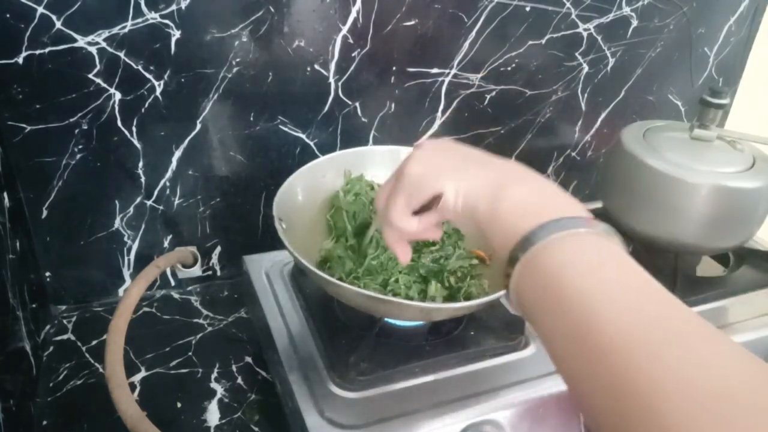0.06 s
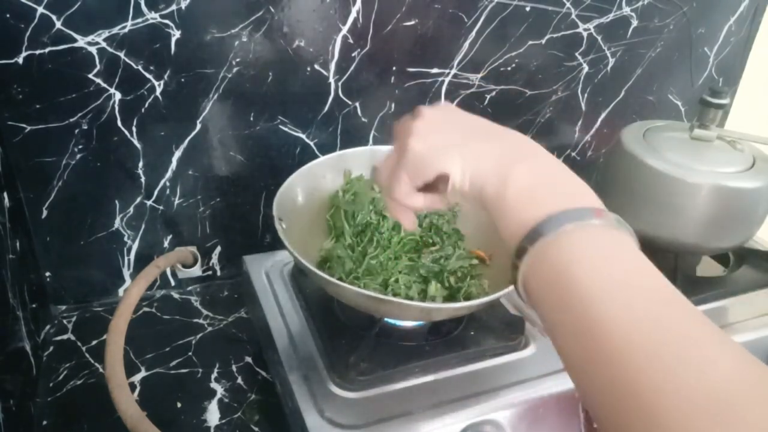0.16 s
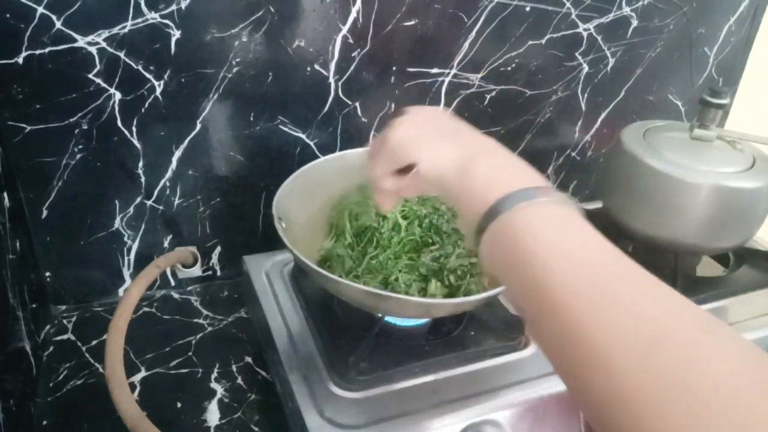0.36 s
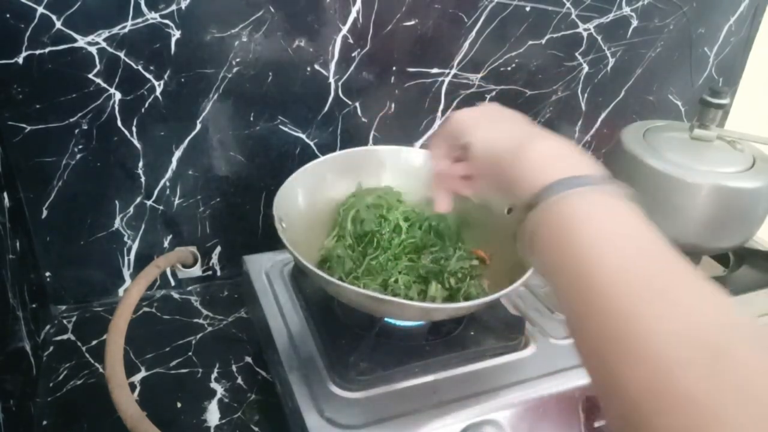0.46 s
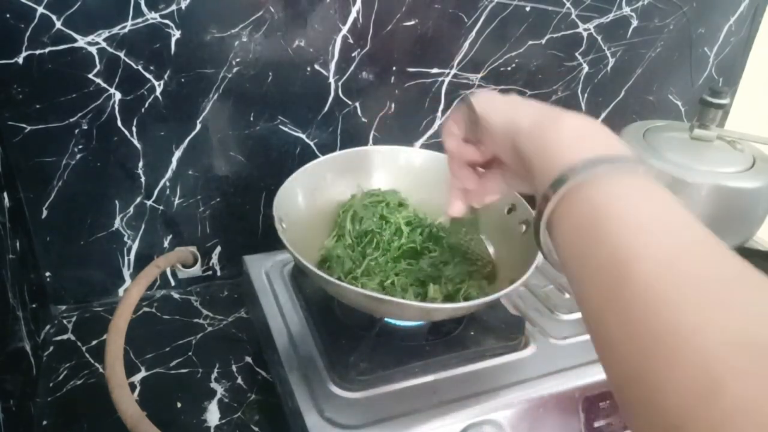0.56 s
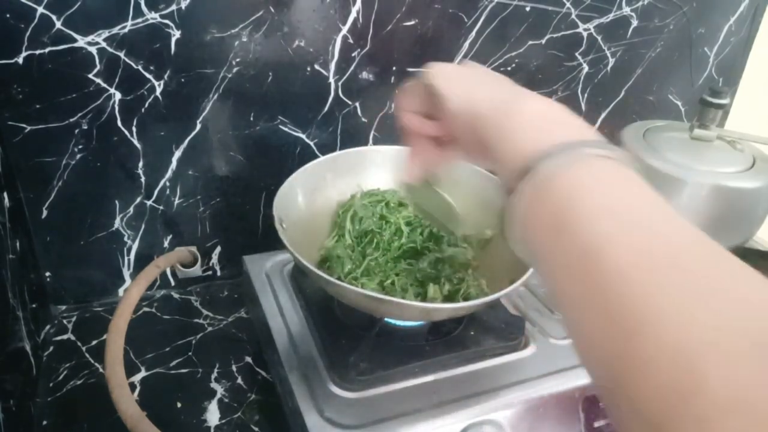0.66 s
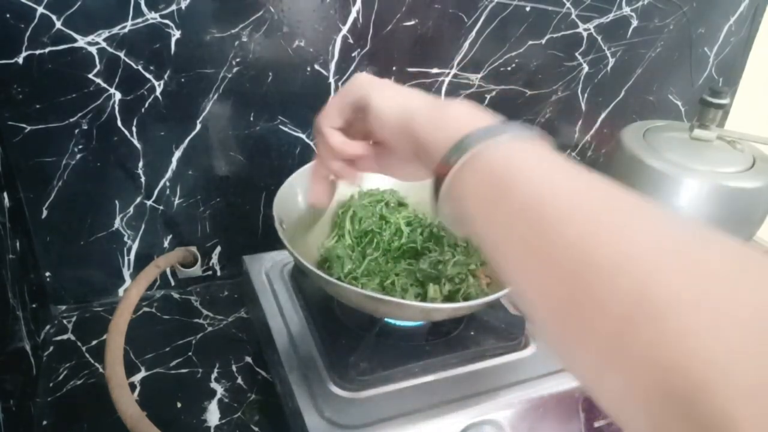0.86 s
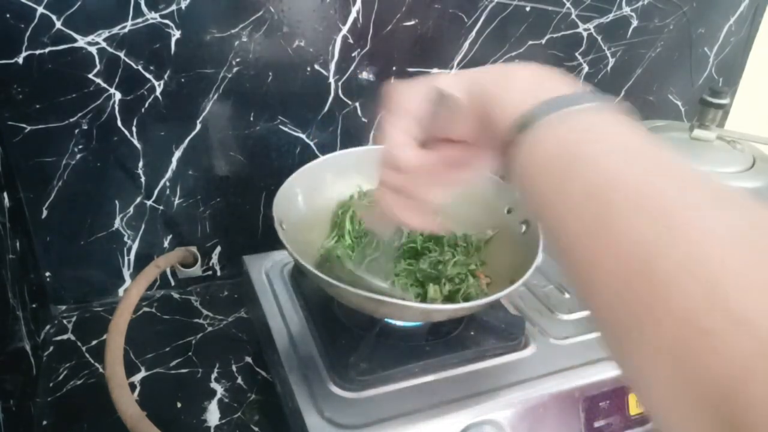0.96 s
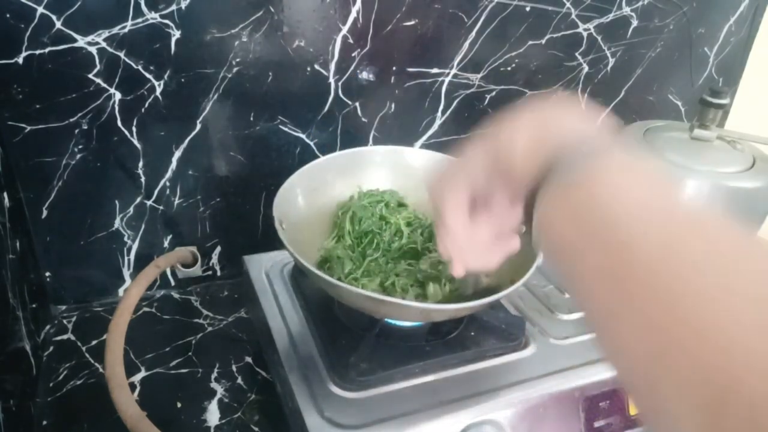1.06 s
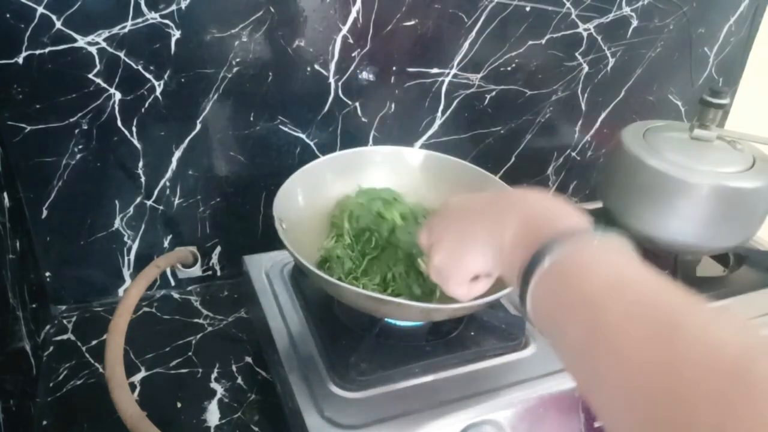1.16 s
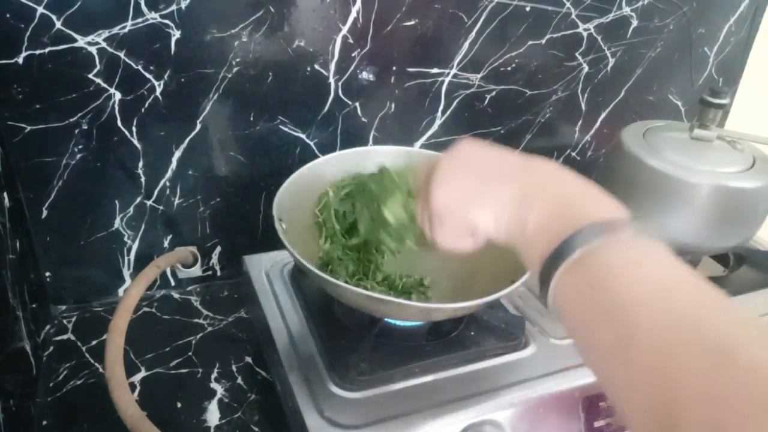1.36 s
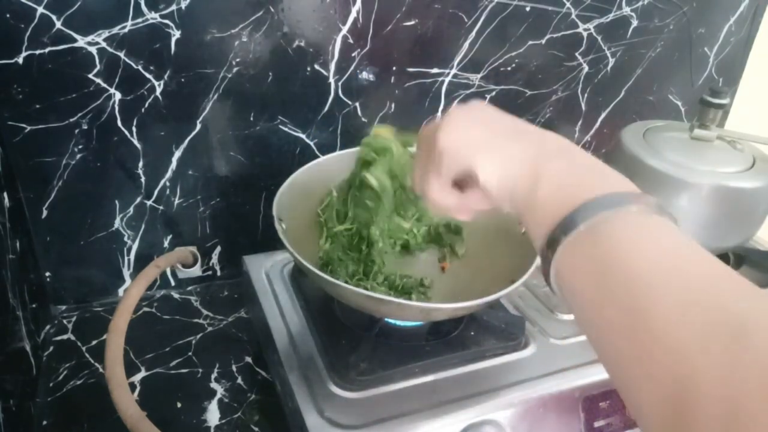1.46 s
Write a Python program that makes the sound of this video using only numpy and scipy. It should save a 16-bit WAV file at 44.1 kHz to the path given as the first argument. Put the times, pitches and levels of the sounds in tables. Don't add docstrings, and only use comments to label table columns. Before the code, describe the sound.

Two quick strokes of a steel spatula against a metal pan, each a knock then a thin scrape and duller grinding push, the second knock louder and ringing, over quiet flame hiss in a small hard-walled kitchen, heard close.

```python
import sys
import numpy as np
from scipy import signal
from scipy.fft import rfft, irfft, next_fast_len
from scipy.io import wavfile

SR = 44100
rng = np.random.default_rng(int(sys.argv[2]) if len(sys.argv) > 2 else 0)


def volts(x):
    e = np.asarray(x, float) / 20
    return 10 ** e


def put_to_file(sound):
    columns = np.atleast_2d(sound).T
    safe = np.clip(columns, -1, 1)
    whole_steps = np.round(safe * 32767)
    wavfile.write(sys.argv[1], SR, whole_steps.astype(np.int16))


N = 66150
SIZE = next_fast_len(N + SR // 2)
HZ = np.arange(SIZE // 2 + 1) * SR / SIZE
AGE = np.arange(SR // 3) / SR
SPOTS, SPOT_S = 6, 0.035


def rms_one(x):
    return x / np.sqrt(np.mean(x ** 2) + 1e-20)


def at_hz(points, hz):
    points = np.array(points)
    return np.interp(np.log(hz + 1), np.log(points[:, 0]), points[:, 1])


def share_ports(mid, side, hz):
    # f/Hz, left-right likeness
    likeness = [(100, .97), (350, 0.96), (600, 0.62), (1000, 0.16), (4000, 0.13), (12000, 0)]
    alike = np.clip(at_hz(likeness, hz), -1, 1)
    return np.sqrt(1 + alike) * mid + np.sqrt(1 - alike) * side * [[1], [-1]]


def pair(mid, side):
    return share_ports(mid, side, HZ) / np.sqrt(2)


def grains(per_s):
    spread_db = 2.5
    size = volts(spread_db * np.minimum(rng.exponential(1, N), 4)) * rng.choice([-1, 1], N)
    return rms_one(size * (rng.random(N) < per_s / SR))


def stove():
    # f/Hz, level/dB per Hz
    stove_colour = [(20, 4), (38, -15), (85, 3.5), (200, -7.5), (350, -13.5), (1200, -12), (6000, -15.5),
                    (15500, -16.5)]
    spits_per_s, spit_db, stove_db = 620, -12, -50.5
    slips = [grains(spits_per_s), grains(spits_per_s)]
    spits = volts(spit_db) * signal.lfilter([1, -1], 1, slips)
    noise = pair(*rfft(rng.standard_normal((2, N)) + spits, SIZE))
    noise = irfft(noise * volts(at_hz(stove_colour, HZ)), SIZE)[:, :N]
    return rfft(volts(stove_db) * rms_one(noise), SIZE)


def body(hz, db, t60, spot_db, balance_db=0):
    fade = volts(db[:, None] - 60 * AGE / t60[:, None]) * np.exp(2j * np.pi * np.c_[hz] * AGE)
    mid, turn = np.exp(2j * np.pi * rng.random((2, SPOTS, 1, len(hz))))
    turn = turn + 2j * np.sign(turn.imag)
    side = mid * turn / abs(turn)
    share = share_ports(mid, side, np.array(hz)) * volts(np.array([[.5], [-.5]]) * balance_db)
    strength = volts(spot_db * rng.standard_normal((SPOTS, 1, len(hz))))
    out = ((share * strength) @ fade).imag
    return out / np.sqrt(np.sum(out ** 2) / 2 / SPOTS)


def crowd(colour, count):
    t60_at_3khz_s, t60_slope, spot_db = 0.049, -0.39, 3
    span = np.sqrt(np.array(colour)[[0, -1], 0])
    hz = np.sort(rng.uniform(*span, count)) ** 2
    t60 = t60_at_3khz_s * (hz / 3000) ** t60_slope * volts(rng.normal(0, 0.7, count))
    db = at_hz(colour, hz) + 5 * np.log10(hz) - 10 * np.log10(t60) + rng.normal(0, 0.93, count)
    return body(hz, db, t60, spot_db)


def blade_modes():
    blade_hz = [5240, 6070, 6303, 6662, 7220, 7290, 7928, 8462, 9240, 10000, 10905, 11985, 12420, 14480]
    # level/dB, t60/s, left-right balance/dB
    blade_rows = [(-3.5, 0.094, -34), (-6, 0.26, 2), (-12, .18, 2), (-6, 0.21, 3), (3, .18, 5),
                  (-1, .16, 4), (1, 0.13, -3), (-5.5, 0.16, -2.5), (-7, .15, -3), (3, .15, -1),
                  (-5.5, .2, 1), (0, 0.1, -9), (-8, 0.14, 4), (-12, 0.19, 3)]
    db, t60, balance_db = np.transpose(blade_rows)
    return body(blade_hz, db, t60, 4, balance_db)


def bottom_modes():
    bottom_hz = [276, 370, 390, 411, 470, 604, 812, 888, 950, 1020, 1226, 2420, 2810, 2990]
    # level/dB, t60/s
    bottom_rows = [(2, 0.12), (-5, 0.17), (-3.5, 0.24), (-2, 0.16), (-10, 0.28), (-7.5, 0.17), (-5, .15),
                   (-5, 0.18), (-3, .16), (-1, 0.15), (-4.5, 0.22), (-9, 0.17), (-12, 0.045), (-8.5, .12)]
    return body(bottom_hz, *np.transpose(bottom_rows), spot_db=4)


def wall_modes():
    wall_hz = [172, 276, 393, 480, 884, 1020, 1405, 1879, 2026, 2708, 2896, 3478, 4300, 5240]
    # level/dB, t60/s
    wall_rows = [(-6, 0.17), (-2.5, 0.21), (-4, 0.28), (-12, 0.17), (-2, 0.29), (3, .18), (0.5, 0.32),
                 (-9.5, 0.25), (4.5, 0.79), (-3, 0.53), (-3.5, 0.37), (-13, 0.59), (-2, 0.39), (-2.5, 0.13)]
    return body(wall_hz, *np.transpose(wall_rows), spot_db=-1.2)[0]


def effort(column):
    # t/s, edge skating level/dB, bottom pressure level/dB
    moves = [
        [(.19, -59, -57), (.2015, -44, -48), (.2025, -20.5, -31), (.236, -23.5, -42.5), (.278, -34.5, -40.5),
         (.289, -31, -52)],
        [(.289, -26, -38), (.296, -24, -26.5), (.316, -17.5, -19), (.35, -21, -23.5), (.388, -28, -29),
         (.426, -27, -36), (.46, -43, -37.5), (.53, -90, -69)],
        [(.695, -57, -64), (.7155, -35, -40), (.7168, -14, -22), (.724, -19, -26), (.74, -27.5, -25.5),
         (.765, -28, -32), (.817, -20.5, -37.5), (.845, -29, -51), (.874, -33, -56)],
        [(.874, -26, -49), (.881, -19.5, -44.5), (.928, -40.5, -26), (.952, -37.5, -31.5), (.964, -24, -28.5),
         (.99, -29, -26), (1.04, -35, -32), (1.082, -36.5, -43.5), (1.14, -87, -58.5)],
    ]
    t, out = np.arange(N) / SR, np.zeros(N)
    for rows in map(np.array, moves):
        out += volts(np.interp(t, rows[:, 0], rows[:, column], -200, -200))
    return out


def along(force):
    away = (np.arange(N) / SR / SPOT_S - np.arange(SPOTS)[:, None]) % SPOTS - 1
    return rfft(force * np.cos(np.pi / 2 * np.clip(away, -1, 1)), SIZE)[:, None]


def skating(bright, blade):
    force = grains(5500) * effort(column=1)
    high_pass = signal.butter(6, 4960, "high", fs=SR, output="sos")
    return along(signal.sosfilt(high_pass, force)) * rfft(bright + volts(-9) * blade, SIZE)


def digging(dull):
    force = grains(1800) * effort(column=2)
    return along(force) * rfft(dull + volts(-1) * bottom_modes(), SIZE)


def impacts(rows):
    level_db = 21.5
    out, age = np.zeros(N), AGE[:3000]
    for s, db, hz, width_hz, chatter_s in rows:
        chatter = rng.standard_normal(len(age)) ** 3 * np.exp(-age / chatter_s)
        r = np.exp(-np.pi * width_hz / SR)
        chatter = signal.lfilter([1, 0, -1], [1, -2 * r * np.cos(2 * np.pi * hz / SR), r * r], chatter)
        start = int(s * SR)
        out[start:start + len(age)] += chatter / np.sqrt(np.sum(chatter ** 2)) * volts(db + level_db)
    return out


def knocks(bright, dull, blade):
    # t/s, force level/dB, contact centre f/Hz, width/Hz, chatter/s
    knock_rows = [
        (.2027, -26.5, 9300, 15000, 0.001),
        (.291, -17, 7820, 1200, 0.014),
        (.7168, -16, 7780, 890, 0.0019),
        (.7165, -17, 11500, 1500, 0.0015),
        (0.75, -22.5, 10000, 7100, .004),
        (0.9, -26.5, 2650, 460, 0.0098),
        (1, -28.5, 3600, 6800, 0.014),
        (0.412, -27.5, 6550, 480, 0.018),
    ]
    return along(impacts(knock_rows)) * rfft(blade + bright + dull, SIZE)


def blows():
    # t/s, force level/dB, contact centre f/Hz, width/Hz, chatter/s
    blow_rows = [
        (.2027, -28, 2331, 5150, 0.00044),
        (.305, -30.5, 190, 155.7, 0.011),
        (.7168, -16, 2180, 5700, 0.00052),
        (.724, -22, 171.4, 120, 0.0084),
        (.82, -39, 444, 200, 0.011),
        (1.01, -31, 176, 101, 0.0075),
    ]
    return rfft(impacts(blow_rows), SIZE) * rfft(wall_modes(), SIZE)


def stirring():
    # f/Hz, level/dB
    edge_colour = [(4850, -10), (5500, -4), (6500, 2), (7500, -1.5), (9000, -3.5), (11000, -4.5),
                   (13000, -6), (15700, -4)]
    # f/Hz, level/dB
    press_colour = [(200, -27), (400, -3.5), (620, -8.5), (950, -1.5), (1800, -4.5), (2900, -5.5),
                    (4200, -11), (9000, -25)]
    low_hz = 117
    blade = blade_modes()
    bright, dull = crowd(edge_colour, count=340), crowd(press_colour, count=240)
    contact = skating(bright, blade) + digging(dull) + knocks(bright, dull, blade)
    total = np.sum(contact, axis=0) + blows()
    return total * (1j * HZ / (low_hz + 1j * HZ)) ** 2


def kitchen():
    t60_s, tail_db, gap_s = 0.31, -10.5, 0.0035
    tail = rng.standard_normal((2, len(AGE))) * volts(-60 * AGE / t60_s) * (AGE > gap_s)
    tail = tail / np.sqrt(np.sum(tail[0] ** 2))
    return 1 + volts(tail_db) * pair(*rfft(tail, SIZE))


def scene():
    # f/Hz, left-right level/dB
    port_colour = [(500, -0.5), (1500, 2), (3000, 1), (6500, 8.5), (8500, -8), (11000, -2.5), (13000, 5.5)]
    ports = volts(at_hz(port_colour, HZ) * [[.5], [-.5]])
    return irfft((stove() + stirring() * kitchen()) * ports, SIZE)[:, :N]


def band_limit(x):
    return signal.sosfilt(signal.butter(12, 16640, fs=SR, output="sos"), x)


def record(dry):
    edge_hz = [15650, 13600]
    beyond_db = [-40, -33]
    top = volts(np.c_[beyond_db] / (1 + np.exp((np.c_[edge_hz] - HZ) / 60)))
    mix = irfft(rfft(dry, SIZE) * top, SIZE)[:, :N]
    return band_limit(mix)


dry = scene()
out = record(dry)
put_to_file(out)
```